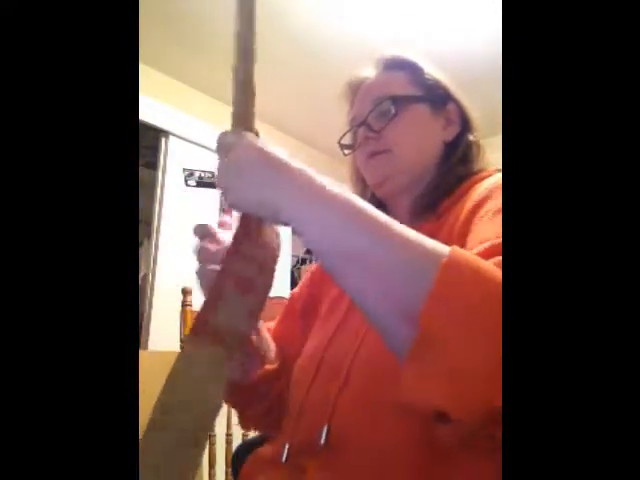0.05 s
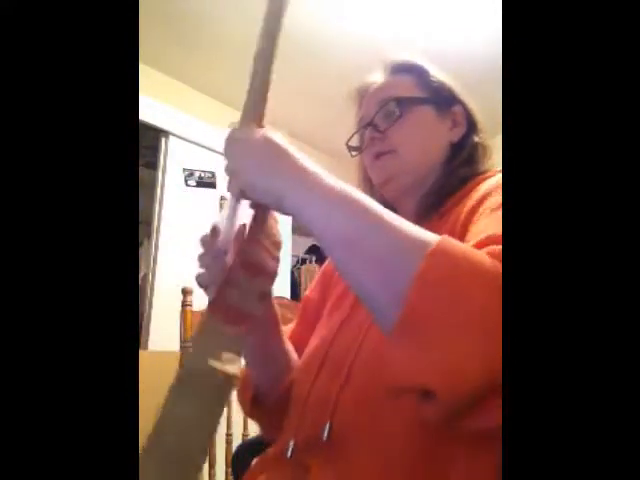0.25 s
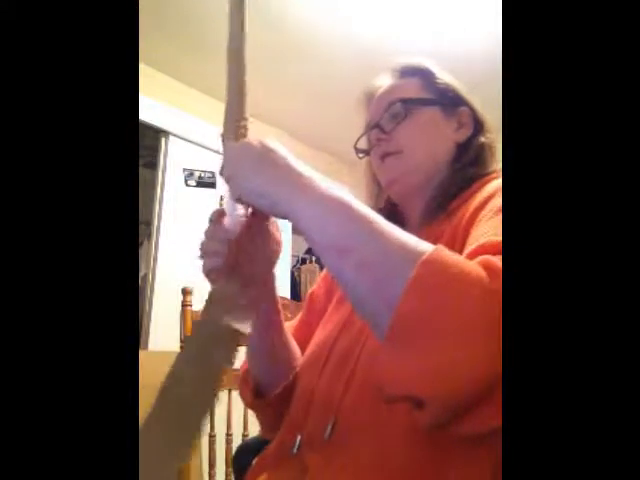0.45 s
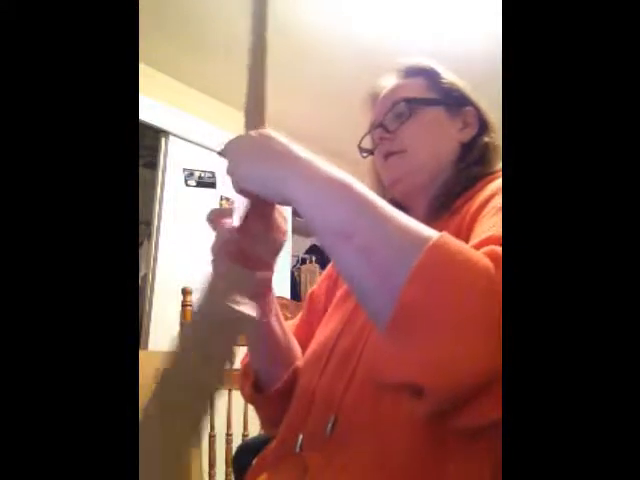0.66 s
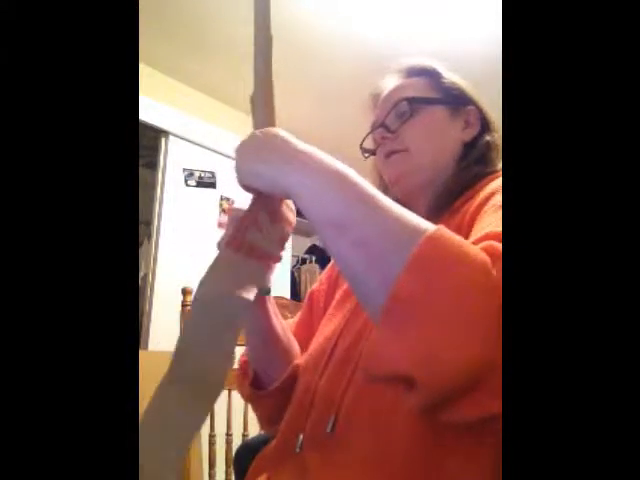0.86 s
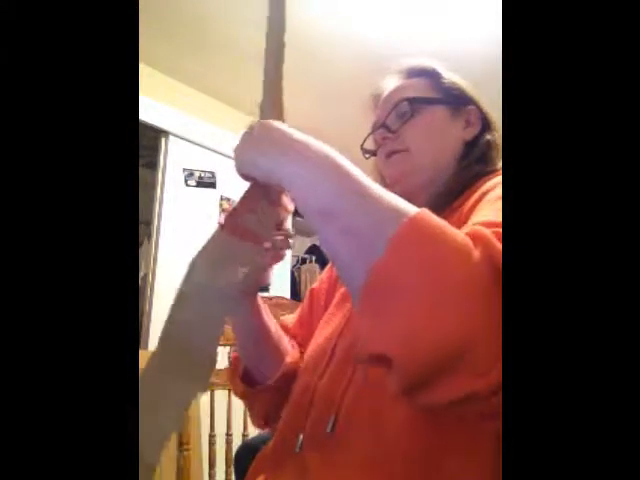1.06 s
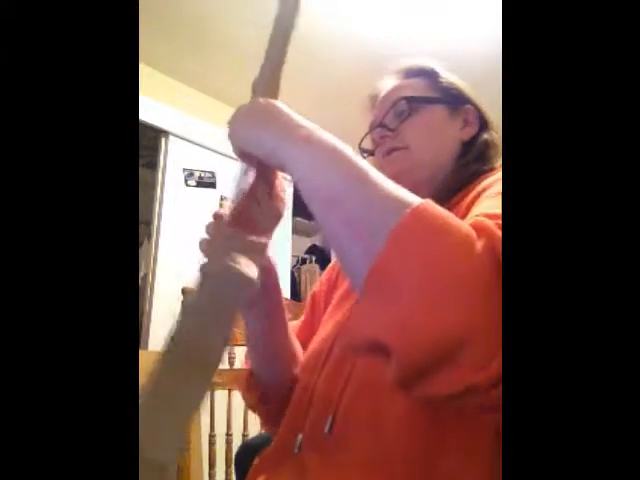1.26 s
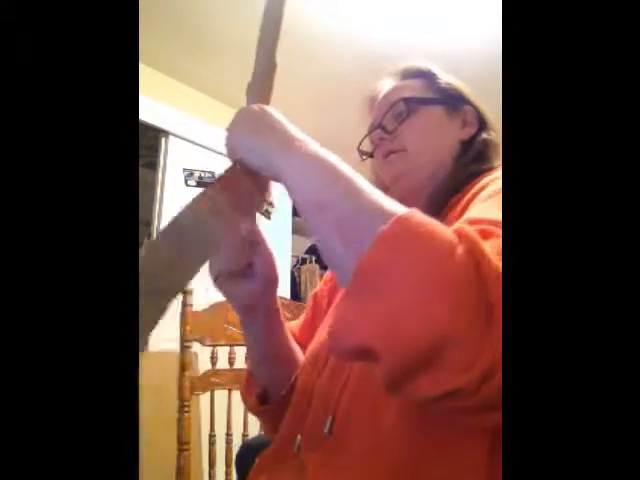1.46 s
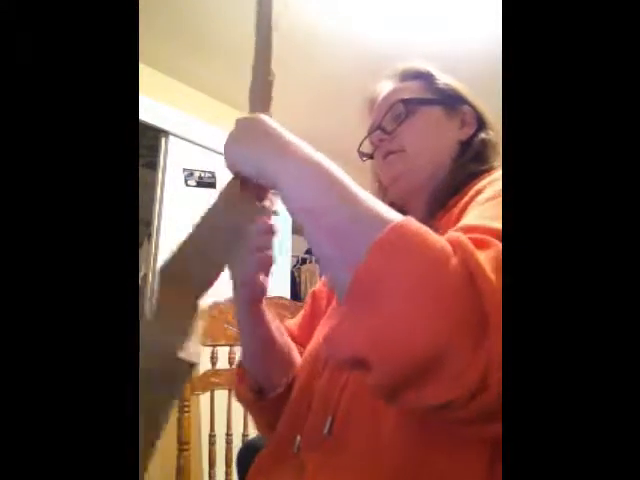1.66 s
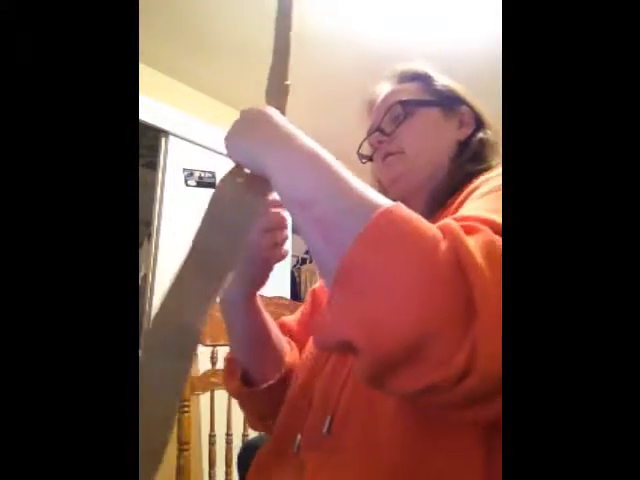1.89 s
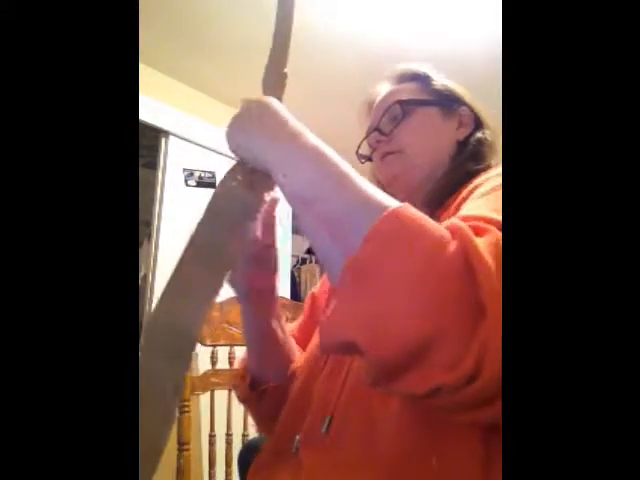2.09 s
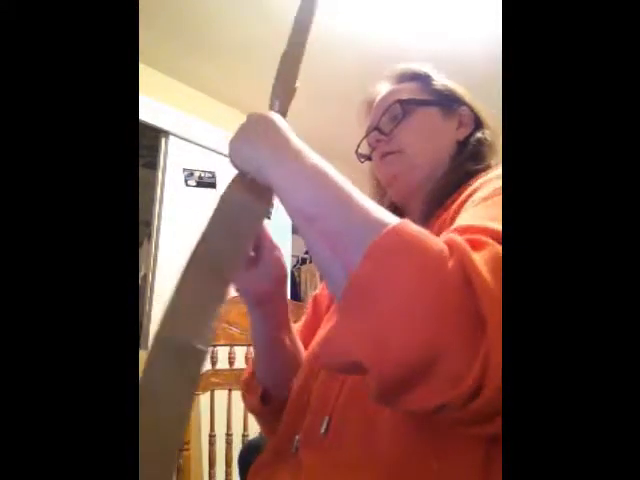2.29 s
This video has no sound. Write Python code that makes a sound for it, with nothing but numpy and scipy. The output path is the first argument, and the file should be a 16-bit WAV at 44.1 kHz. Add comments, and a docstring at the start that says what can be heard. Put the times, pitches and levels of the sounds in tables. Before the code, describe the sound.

Paper crinkles and rustles softly as hands twist it around a long rod.

```python
"""Brown paper twisted by hand around a long rod, close to one microphone in a small room.
Creases snap as the sheet is squeezed, wrinkles tick under the fingertips, and now and then
a loose panel buckles with a hollow pop. Between them the paper rustles as it slides and crumples,
and an edge scrapes along the rod. The nearest wall throws the cracks back; behind it all
lie a short room tail, quiet air and a faint mains hum."""
import sys
import numpy as np
from scipy import signal
from scipy.fft import rfft, irfft
from scipy.io import wavfile
from scipy.ndimage import uniform_filter1d

SR = 44100
rng = np.random.default_rng(int(sys.argv[2]) if len(sys.argv) > 2 else 0)


def persist_wave(psi):
    """Save psi, clipped to +-1, as 16-bit WAV."""
    counts = np.round(np.clip(psi, -1, 1) * 32767).astype(np.int16)
    wavfile.write(sys.argv[1], SR, np.atleast_2d(counts).T)


N = 102753
TIME = np.arange(N) / SR
EVENT_TIME = np.arange(2048) / SR  # span of one snap, tick or pop
BINS_HZ = np.fft.rfftfreq(2048, 1 / SR)

# spectrum of the room's air: f/Hz, level/dB
AIR_SPECTRUM = [(20, -34), (75, -27), (105, -2.5), (260, 4.5), (400, -8), (3000, -11), (15000, -7.5)]
# time the room takes to die away by 60 dB: f/Hz, t/s
ROOM_DECAY = [(200, 0.88), (1000, 0.33), (3000, 0.17), (8000, 0.13), (16000, 0.38)]
# an edge scraping along the rod: middle t/s, level/dB, half length/s, f/Hz
EDGE_SCRAPES = [(0.135, -57.5, 0.025, 2860), (0.424, -54, 0.056, 2900), (1.497, -53.5, 0.0062, 1600),
                (1.517, -60.5, 0.031, 555), (1.609, -44.5, 0.029, 3230), (1.691, -59, 0.028, 2320)]
# loudness of the paper sliding under the hand: t/s, level/dB
SLIDE_LEVELS = [(.025, -62), (.045, -51), (.10, -61), (.155, -53), (.21, -56.5), (.245, -51), (.33, -60.5),
                (.42, -52), (.52, -55), (.59, -62), (.62, -55), (.66, -61), (.72, -57.5), (.81, -61),
                (.92, -55), (1.07, -52), (1.14, -56), (1.2, -57), (1.32, -54.5), (1.35, -58.5),
                (1.38, -54.5), (1.52, -53.5), (1.62, -44), (1.68, -54.5), (1.73, -62), (1.805, -57.5),
                (1.83, -52.5), (1.90, -52.5), (1.97, -59), (2.035, -68.5), (2.045, -47), (2.085, -54),
                (2.13, -60), (2.27, -59.5), (2.33, -54.5)]
# spectrum of that rubbing: f/Hz, level/dB
SLIDE_SPECTRUM = [(150, -30.5), (500, -8.5), (1200, -7.5), (1850, -5.5), (2300, 1.5), (4300, 3), (6800, 2),
                  (9000, -3.5), (11000, -5), (15500, -11.5)]
# the hand squeezing the whole sheet: peak t/s, level/dB, rise/s, fall/s
HAND_SQUEEZES = [(.045, -52, .016, .01), (.17, -58.5, .082, .053), (.428, -48.5, .048, .074),
                 (1.074, -49.5, .028, .024), (1.188, -49, .009, .013), (1.58, -44.5, .047, .04),
                 (1.926, -59.5, .06, .032)]
# spectrum of the crumpling sheet: f/Hz, level/dB
CRUMPLE_SPECTRUM = [(100, -25), (220, -8.5), (500, 2.5), (1000, 1.5), (2000, 1.5), (5000, -2.5),
                    (8000, -3.5), (15000, -17)]
# the sheet's response to a sudden slip: f/Hz, level/dB
SHEET_SPECTRUM = [(100, -67), (250, -11), (500, 2), (1000, 6.5), (1750, -2), (2350, 5.5), (3900, 0.5),
                  (5000, -1), (7300, 0.5), (9000, 3), (10500, -3.5), (16000, 3)]
# loose panels buckling: t/s, level/dB, f/Hz
PANEL_POPS = [(.4236, -39.3, 548), (.770, -65, 560), (.8265, -54, 545), (.947, -60, 560), (1.069, -55, 260),
              (1.574, -48, 480), (1.592, -56, 250)]
# modes of a panel: frequency ratio, level/dB
PANEL_MODES = [(1, 0), (1.75, -15)]
# dry ticks at the fingertips: t/s, level/dB, centre f/Hz
FINGERTIP_TICKS = [(0.332, -58, 3720), (0.5508, -51, 5400), (0.608, -56, 5700), (0.635, -56.5, 6360),
                   (0.7323, -47.5, 7500), (.748, -54, 7500), (0.8262, -54, 4120), (.8316, -53.5, 4700),
                   (0.8576, -54.5, 4320), (.8679, -54, 5700), (0.9078, -54, 5000), (0.913, -51, 5140),
                   (0.9554, -55.5, 3440), (1.3695, -52, 4720), (1.377, -50.5, 4650), (1.405, -62, 7100),
                   (1.8037, -50.5, 6700), (2.0011, -61, 4270), (2.2354, -57.5, 5500), (2.258, -54, 3600)]
# creases snapping: t/s, level/dB, centre f/Hz, width/octaves
CREASE_SNAPS = [(0.0424, -54, 3400, 0.5), (0.05, -51.5, 4740, 1), (0.186, -48.5, 2600, 0.72),
                (.4238, -42.5, 2920, 1.2), (0.8202, -50.5, 4000, 1.6), (0.984, -52, 2930, 0.96),
                (0.9874, -51, 2830, 1.7), (1.0265, -43.5, 3520, 2.06), (1.049, -41.5, 3300, .75),
                (1.0528, -39.3, 3100, .4), (1.068, -42, 2800, 1.15), (1.1818, -41.5, 2100, 1.1),
                (1.2022, -48, 4440, 0.52), (1.2286, -35.5, 4970, 1.33), (1.5307, -37.5, 3100, 1),
                (1.5554, -33.7, 2700, 1.2), (1.5698, -28.3, 4950, .22), (1.5702, -34, 6400, .4),
                (1.571, -34.5, 2700, 1), (1.6116, -48, 3530, 1), (1.9203, -49.5, 2500, 0.43),
                (2.041, -46, 5830, 1.6), (2.046, -43.5, 7300, .8), (2.055, -55, 6500, 1.1),
                (2.0825, -47, 7000, 1.4)]


def amp(db):
    """Decibels to gain."""
    return 10 ** (np.asarray(db) / 20)


def unit_rms(x):
    """Scales to an rms of one."""
    return x / np.sqrt(np.mean(x ** 2) + 1e-20)


def curve(points, hz=BINS_HZ):
    """Reads a table on a log-frequency axis."""
    f, value = np.transpose(points)
    return np.interp(np.log(hz + 1), np.log(f + 1), value)


def add(mix, start_s, sound):
    """Mixes a sound in at a time."""
    part = mix[max(round(start_s * SR), 0):][:len(sound)]
    part += sound[:len(part)]


def colour(x, db):
    """Minimum-phase filter with the given gain at each of BINS_HZ."""
    log_gain = np.log(amp(np.r_[db, db[-2:0:-1]]) + 1e-6)
    taps = np.fft.ifft(np.exp(np.conj(signal.hilbert(log_gain)))).real
    return signal.fftconvolve(x, taps)[:len(x)]


def at_level(x, db):
    """Gives a short sound the energy of 4 ms at that level."""
    return amp(db) * x * np.sqrt(.004 * SR / np.sum(x ** 2))


def room_tone(hum_hz=124.5):
    """The room at rest: quiet air over a mains hum."""
    air = unit_rms(colour(rng.standard_normal(N), curve(AIR_SPECTRUM)))
    hum = unit_rms(np.sin(2 * np.pi * hum_hz * TIME))
    return amp(-66) * air + amp(-82) * hum


def room_tail(x, delay_s=.008):
    """Dense reflections reach the microphone after the direct sound; the bass lingers longest."""
    size = SR // 2
    reflections = rng.standard_normal(size) * (rng.random(size) < .2)
    hz, t, spectra = signal.stft(reflections, SR, nperseg=256)
    decay = amp(-60 * t / curve(ROOM_DECAY, hz)[:, None])
    tail = signal.istft(spectra * decay, SR)[1]
    out = np.zeros(N)
    add(out, delay_s, signal.fftconvolve(x, tail / np.linalg.norm(tail)))
    return out


def edge_scrapes(width_octaves=.22):
    """An edge slipping along the rod excites one narrow resonance of the rolled sheet."""
    out = np.zeros(N)
    for middle_s, db, half_s, hz in EDGE_SCRAPES:
        resonance_db = -20 * np.log10(1 + (np.log2((BINS_HZ + 1) / hz) / width_octaves) ** 2)
        scrape = unit_rms(colour(rng.standard_normal(N), resonance_db))
        out += amp(db) * scrape * np.exp(-((TIME - middle_s) / half_s) ** 2)
    return out


def fibre_crackle(grains_per_s=1100, flutter_s=.014, flutter_db=2):
    """Fibres catching and slipping: clumped clicks, mostly small, over a fine hiss."""
    clumps = unit_rms(uniform_filter1d(rng.standard_normal(N), int(flutter_s * SR)))
    sizes = amp(1.5 * np.minimum(rng.exponential(1, N), 3.5))
    grains = unit_rms(sizes * rng.choice([-1, 1], N) * (rng.random(N) < grains_per_s / SR))
    hiss = rng.standard_normal(N)
    return (amp(-5.5) * grains + amp(-5) * hiss) * amp(flutter_db * clumps)


def sheet_band(hz, width_octaves):
    """The sheet's spectrum in dB, lifted in one band above a low skirt."""
    peak = np.exp(-(np.log2((BINS_HZ + 1) / hz) / width_octaves) ** 2)
    return 20 * np.log10(peak + amp(-28)) + curve(SHEET_SPECTRUM)


def sheet_crack(decay_s):
    """A sharp crack, then waves of all lengths scattering through the sheet."""
    t = EVENT_TIME
    spectrum = rfft(rng.standard_normal(len(t)) * np.exp(-(t / decay_s) ** 2))
    flattened = spectrum / (abs(spectrum) + 1e-9) ** .7
    scatter = irfft(flattened) * np.exp(-t / (2 * decay_s))
    return .33 * (t == 0) + scatter / np.linalg.norm(scatter)


def wrinkle(hz):
    """One small wrinkle flipping: the smaller it is, the higher it clicks."""
    return colour(sheet_crack(decay_s=.0013), sheet_band(hz, width_octaves=1.1))


def crinkles(per_s=280, centre_hz=5040, range_octaves=.94):
    """A scatter of tiny wrinkles, each with its own level and pitch."""
    out = np.zeros(N)
    for when, faintness, pitch in rng.random((int(per_s * N / SR), 3)):
        hz = centre_hz * 2 ** (range_octaves * (2 * pitch - 1))
        db = -1.5 * np.log(faintness + .05)
        add(out, when * N / SR, at_level(wrinkle(hz), db))
    return unit_rms(out)


def slide():
    """Bright rustle of paper rubbing on paper and skin, dotted with crinkles."""
    rub = unit_rms(colour(fibre_crackle(), curve(SLIDE_SPECTRUM)))
    level_db = np.interp(TIME, *np.transpose(SLIDE_LEVELS))
    return unit_rms(rub + amp(-6) * crinkles()) * amp(level_db)


def crumple():
    """Fuller rustle of the whole sheet, swelling and dying with each squeeze."""
    swell = sum(amp(db) * np.exp(-np.maximum((peak_s - TIME) / rise_s, (TIME - peak_s) / fall_s))
                for peak_s, db, rise_s, fall_s in HAND_SQUEEZES)
    return unit_rms(colour(fibre_crackle(), curve(CRUMPLE_SPECTRUM))) * swell


def curl_resonances(x, depth_db=2.4, width_hz=260, drift_s=.08):
    """The curled sheet lifts some pitches and hollows out others, shifting as it is bent."""
    hz, t, spectra = signal.stft(x, SR, nperseg=512)
    ripple = rng.standard_normal((len(t), len(hz)))
    ripple = uniform_filter1d(ripple, int(drift_s / t[1]), axis=0)
    ripple = uniform_filter1d(ripple, int(width_hz / hz[1]), axis=1)
    gain = unit_rms(amp(depth_db * unit_rms(ripple)))
    return signal.istft(spectra * gain.T, SR)[1][:N]


def panel_pops(rise_s=.0006, decay_s=.0062, low_cut_hz=200):
    """A buckling panel rings for a few cycles with a dull scuff and radiates little bass."""
    out, t = np.zeros(N), EVENT_TIME
    envelope = (1 - np.exp(-t / rise_s)) * np.exp(-(t / decay_s) ** 2)
    for start_s, db, hz in PANEL_POPS:
        ring = sum(amp(mode_db) * np.sin(2 * np.pi * hz * ratio * t) for ratio, mode_db in PANEL_MODES)
        scuff = unit_rms(colour(rng.standard_normal(len(t)), sheet_band(hz, width_octaves=.61)))
        add(out, start_s, at_level((ring + .2 * scuff) * envelope, db))
    return signal.sosfilt(signal.butter(2, low_cut_hz, "high", fs=SR, output="sos"), out)


def fingertip_ticks():
    """Single wrinkles flip under the fingertips."""
    out = np.zeros(N)
    for start_s, db, hz in FINGERTIP_TICKS:
        add(out, start_s, at_level(wrinkle(hz), db))
    return out


def crease_snaps(typical_db=-40, typical_decay_s=.0027, halving_db=32):
    """Each crease rings briefly in a band set by its size; hard ones give way fastest."""
    out = np.zeros(N)
    for start_s, db, hz, width_octaves in CREASE_SNAPS:
        decay_s = typical_decay_s * 2 ** ((typical_db - db) / halving_db)
        snap = colour(sheet_crack(decay_s), sheet_band(hz, width_octaves))
        add(out, start_s, at_level(snap, db))
    return out


def scene(wall_echo_s=.0051):
    """At the microphone: the paper up close, its cracks off the nearest wall, the room behind."""
    cracks = crease_snaps() + fingertip_ticks()
    pops = panel_pops()
    rustle = curl_resonances(slide() + crumple()) + edge_scrapes()
    tail = room_tail(amp(-5) * cracks + amp(-19) * pops + amp(-13) * rustle)
    out = cracks + pops + rustle + tail + room_tone()
    add(out, wall_echo_s, amp(-11) * cracks)
    return out[None]


def record(dry):
    """The mono recorder cuts off the highest treble."""
    low_pass = signal.firwin(801, cutoff=15330, window=("kaiser", 8), fs=SR)
    return signal.oaconvolve(dry, low_pass[None], "same")


dry = scene()
out = record(dry)
persist_wave(out)
```